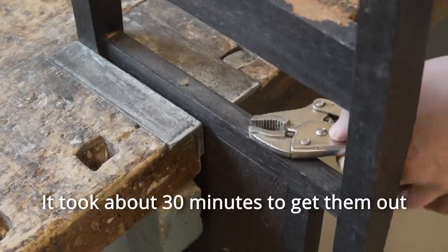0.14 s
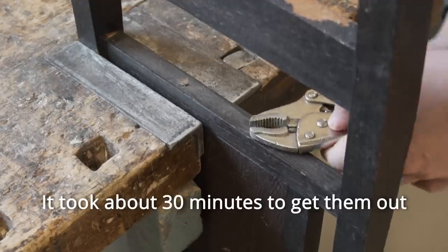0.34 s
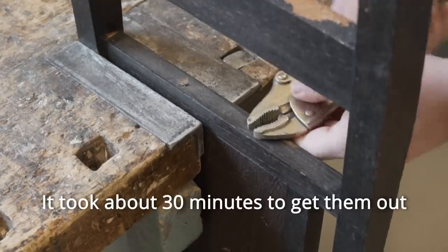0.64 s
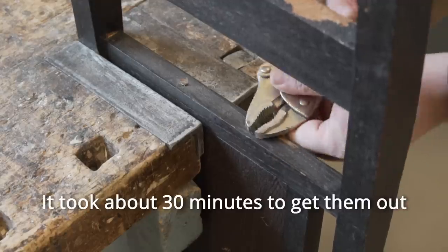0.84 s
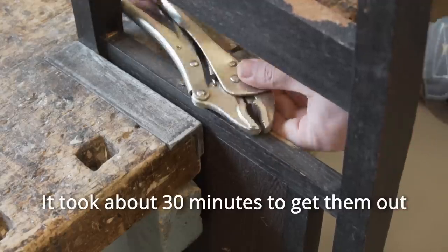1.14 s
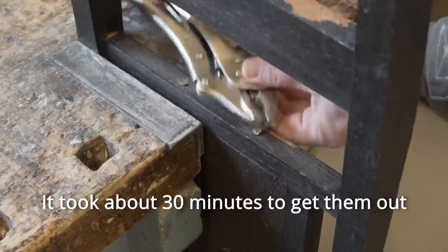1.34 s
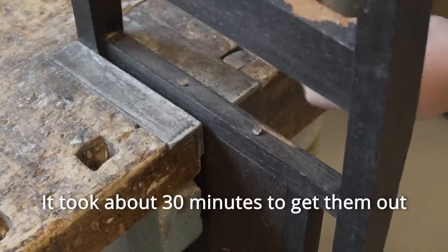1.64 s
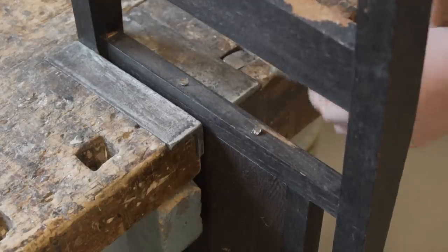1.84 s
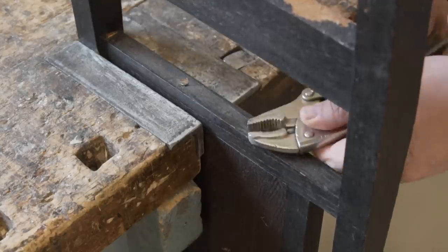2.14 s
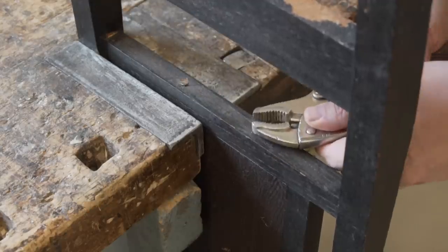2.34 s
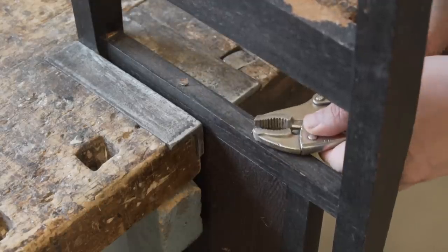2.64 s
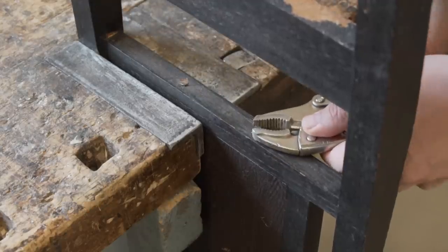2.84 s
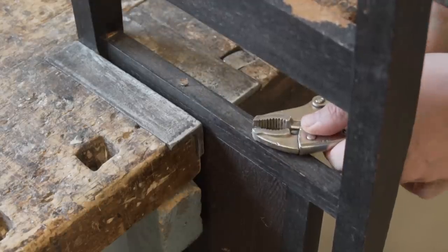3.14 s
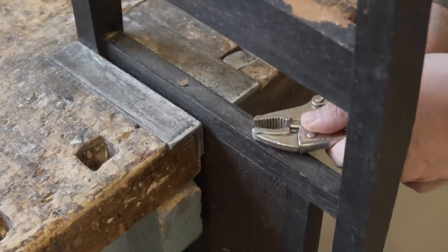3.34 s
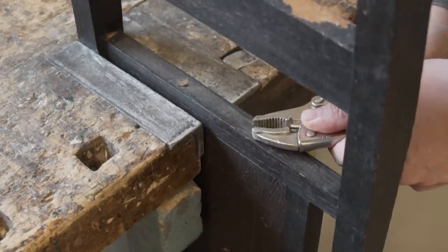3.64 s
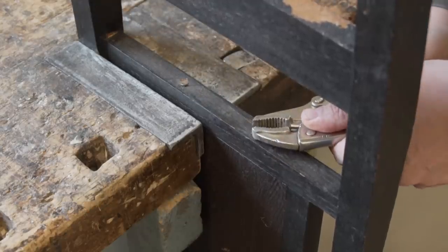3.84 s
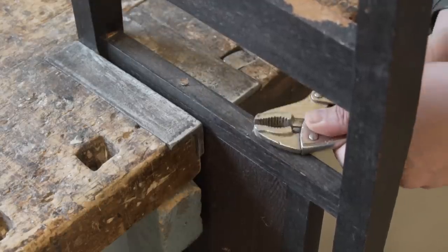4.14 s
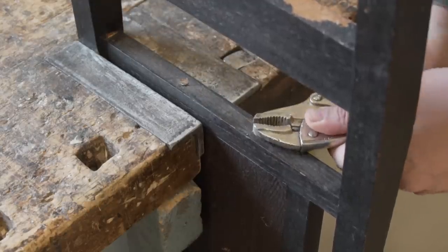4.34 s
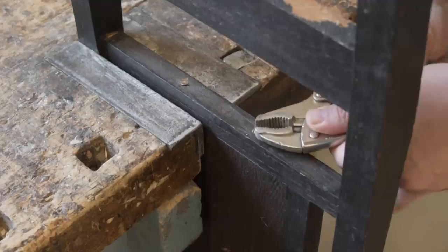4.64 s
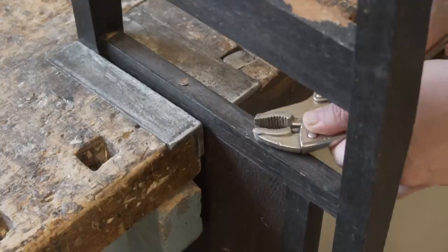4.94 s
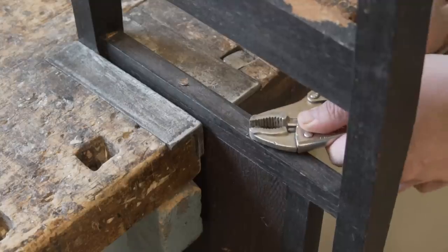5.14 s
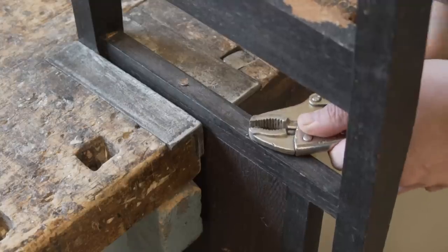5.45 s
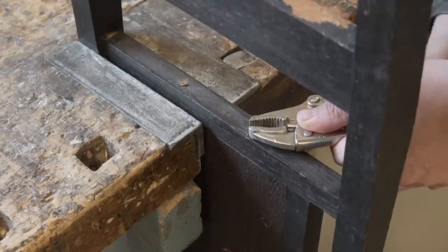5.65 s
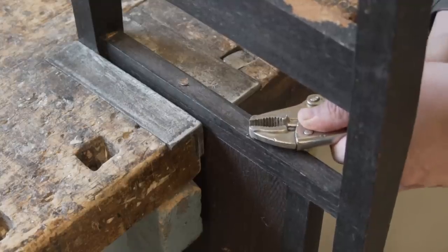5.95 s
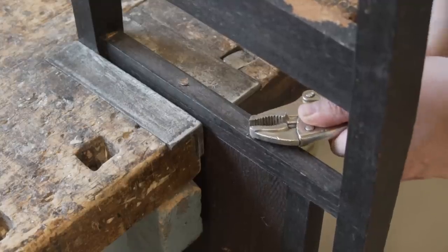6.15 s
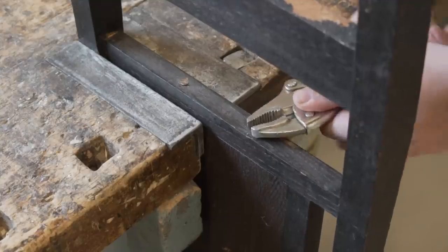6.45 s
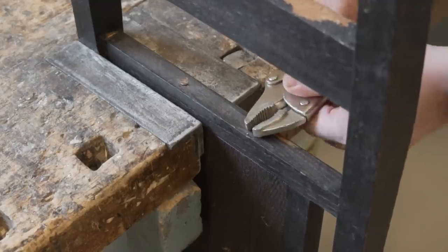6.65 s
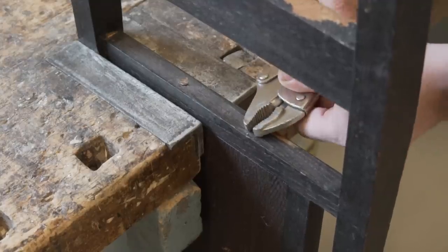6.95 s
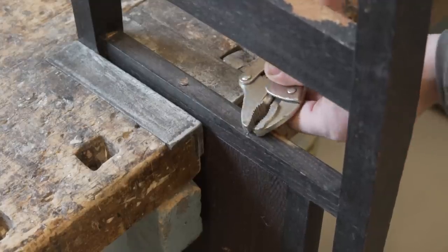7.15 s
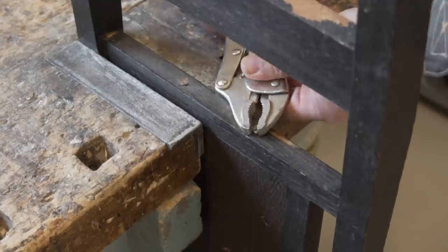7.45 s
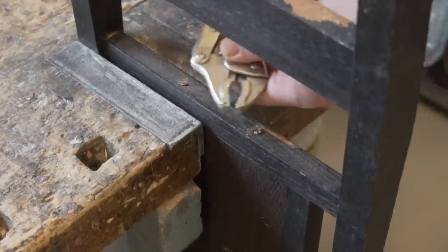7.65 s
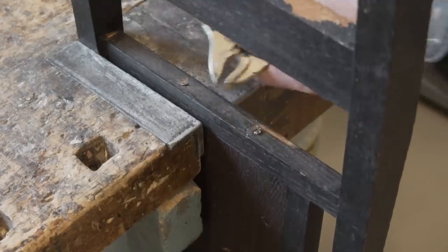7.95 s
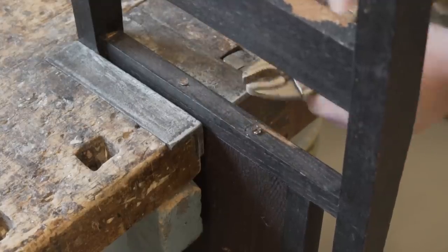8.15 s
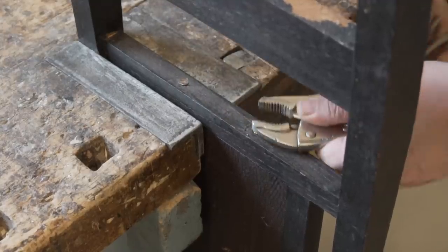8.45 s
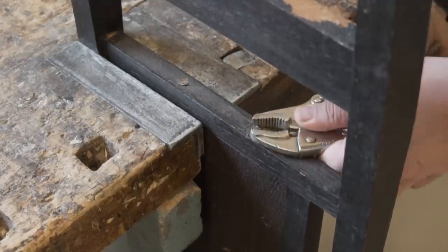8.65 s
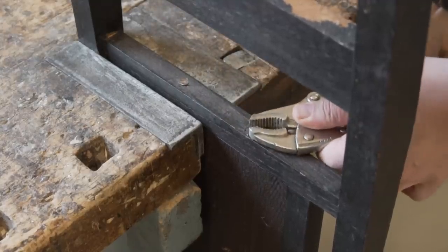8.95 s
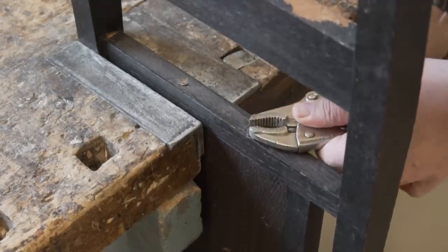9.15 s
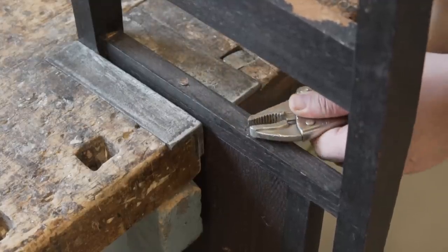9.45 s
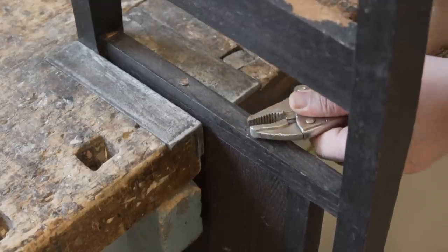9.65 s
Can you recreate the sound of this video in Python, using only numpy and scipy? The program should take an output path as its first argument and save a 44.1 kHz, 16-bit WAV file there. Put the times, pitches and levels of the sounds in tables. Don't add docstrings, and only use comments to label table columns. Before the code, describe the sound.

Locking pliers snap open and shut on a nail in a wooden rail, with hard metallic clacks, knocks, short scrapes and lingering steel ringing.

```python
import sys
import numpy as np
from scipy import signal
from scipy.fft import rfft, irfft
from scipy.io import wavfile
from scipy.ndimage import uniform_filter1d

SR = 44100
rng = np.random.default_rng(int(sys.argv[2]) if len(sys.argv) > 2 else 0)


def dump_mix(stems):
    frames = np.atleast_2d(stems).T
    limited = np.clip(frames, -1, 1)
    pcm = np.round(limited * 32767).astype(np.int16)
    wavfile.write(sys.argv[1], SR, pcm)


def gain_from_decibels(decibels):
    exponent = np.asarray(decibels, float) / 20
    return 10 ** exponent


N = 432180
LEAD = SR // 2
OPPOSITE = np.array([[1], [-1]])


def band(x, lo_hz, hi_hz):
    y = signal.sosfilt(signal.butter(2, [lo_hz, min(hi_hz, .45 * SR)], "band", fs=SR, output="sos"), x)
    return y / np.sqrt(np.mean(y ** 2))


def fade(t, t60_s):
    return np.exp(-np.log(1000) * t / t60_s)


def add(track, s, sound):
    i = max(LEAD + int(s * SR), 0)
    track[..., i:i + sound.shape[-1]] += sound[..., :track.shape[-1] - i]


def blows():
    # [t/s, peak/dB, wood thud/dB, rail body/dB, steel edge/dB]
    snaps = [
        (-0.3938, -11, -11, -5, 9),
        (1.1518, -17, -4, -4, 4),
        (1.1653, -15, -22, -9, 7),
        (1.1717, -8, -21, -5, 1),
        (4.0339, -14.5, -15, -6.5, -5.5),
        (5.678, -13.5, -24, -11, -1),
        (7.5394, -16.5, -5.5, 4.5, 0.5),
        (9.399, -20, -17.5, -8.5, 3),
    ]
    # [t/s, peak/dB, wood thud/dB, rail body/dB, steel edge/dB]
    raps = [(1.0456, -32.5, -1, 3.5, -11.5), (1.1064, -28, -11, -8, -18), (1.14, -30.5, -17, 0, -17),
            (1.1797, -20.5, -5, -9, -9), (1.245, -20, -20, -3, -20), (2.173, -20, -26, -7, -24),
            (2.2115, -27, -30, -9, -25), (2.0603, -17, -24.5, -12.5, -20), (2.0678, -20.5, -19, -6.5, -54),
            (2.5276, -17, -6.5, -5, -27), (2.602, -10, -7, -2, -28), (2.6146, -13, -19, -2.5, -26),
            (4.514, -33, -31, -10.5, -17), (4.575, -25.5, -30, -10, -25), (4.644, -27, -15, -2.5, -23),
            (4.5985, -22, 0, 1, -31), (4.6104, -20.5, -22.5, -5, -22), (4.814, -19.5, 0.5, 3, -5.5),
            (5.0427, -54, -6, -10, -24.5), (5.1017, -28.5, -3, 0.5, -46), (5.6905, -25.5, -30, -2.5, -15.5),
            (6.4613, -32, -26.5, -14.5, -38), (6.6848, -37.5, -45, -6, -19.5), (8.431, -26.5, -20, -6, -19),
            (8.572, -39, -4, -5, -24), (8.7091, -22, -7.5, -4.5, -22.5), (8.8439, -28.5, -5, 0, -25),
            (9.1102, -59, 11.5, -17, 8)]
    # [t/s, peak/dB, wood thud/dB, rail body/dB, steel edge/dB]
    taps = [
        (0.7628, -38, -13, -9, -30),
        (2.165, -8, -26, -15, -21.5),
        (2.2022, -14.5, -37.5, -10, -25),
        (2.5177, -20.5, -10.5, -2.5, -25.5),
        (3.6197, -33, -37.5, -4, 0),
        (4.6776, -24.5, -22, -6, -17),
        (4.6875, -28.5, -21, -39, 10),
        (8.4243, -18.5, -16.5, -12, -19),
    ]
    # [t/s, peak/dB, rail body/dB, steel edge/dB, part f/Hz]
    ticks = [(1.8857, -50, -57, 1, 4000), (1.892, -35, -51, 11.5, 4840), (1.949, -36.5, -23, 5, 3080),
             (2.0262, -34, -40, 5, 4030), (2.4342, -52, -29, -7, 3720), (7.5618, -32, -40, 12, 10600),
             (5.337, -50.5, -16.5, 7.5, 10230), (7.0234, -52.5, -17.5, -1.5, 4610),
             (7.566, -38, -6, 6, 5600), (7.7032, -40, -15, 7, 6400), (7.8316, -37.5, -21, 1, 6340),
             (7.949, -45.5, -24, 7.5, 4080), (8.0312, -42, -32.5, 8.5, 3900), (8.059, -41, -48.5, 2, 3960),
             (8.0983, -49, 1.5, 14, 8050), (8.105, -40, -45.5, 5, 3570), (8.2033, -47, -33, 0.5, 3550),
             (8.2467, -39, -69, 8, 4160)]
    # [t/s, peak/dB, wood thud/dB, steel edge/dB, frame f/Hz]
    bumps = [
        (2.335, -52, 21.5, -19.5, 360),
        (3.17, -79, 16.5, -8.5, 301),
        (4.43, -54.5, 14.5, -6.5, 500),
        (6.05, -71.5, 26.5, -9.5, 350),
        (6.701, -45, -9, -21, 500),
        (8.578, -49.5, 11, -8, 560),
        (8.61, -56, 21.5, -13, 250),
        (3.23, -80.5, 14.5, -7.5, 450),
        (9.13, -75, 23, -5, 260),
    ]
    struck = []
    for rows, room_db, hz in (snaps, -0.67, 1740), (raps, -2, 1780), (taps, -2, 2556):
        struck += [(s, room_db, *rest, hz) for s, *rest in rows]
    thud_db = -49.5
    struck += [(s, -1, peak_db, thud_db, *rest) for s, peak_db, *rest in ticks]
    body_db = 13.5
    bumped = [(s, -2, peak_db, thud, body_db, *rest) for s, peak_db, thud, *rest in bumps]
    return sorted(struck) + bumped


def knock(peak_db, thud_db, body_db, edge_db, hz, tinted):
    # [f/Hz, width/Hz, gain/dB]
    jaws = [(503, 25, 3), (623, 32, 5), (1103, 36, 2), (1600, 54, -2), (2380, 570, 1.5), (3127, 39, 1),
            (4350, 150, -0.5)]
    size = 4096
    t = np.arange(size) / SR
    f = np.arange(size // 2 + 1) * SR / size + 1
    corners_hz = [30, 200, 520, 700, 1350, 1700, 4600, 4950, 12000, 20000]
    dull_db = min(edge_db, 0)
    levels_db = [thud_db - 23, thud_db + 5, thud_db + 14.5, body_db + 7.5, body_db + 5.0, 0,
                 .3 * dull_db - 0.12 * body_db + 0.5, edge_db - 0.28 * dull_db - 0.5,
                 edge_db - 4.0, edge_db - 0.5]
    db = np.interp(np.log(f), np.log(corners_hz), levels_db)
    db += 2.2 * np.interp(np.log(f) * 22, np.arange(240), rng.standard_normal(240))
    shift = 1 + .012 * rng.standard_normal()
    for centre_hz, width_hz, gain in jaws + tinted + [(hz, 0.068 * hz, 6)]:
        db += gain * np.exp(-.5 * ((f - centre_hz * shift) / width_hz) ** 2)
    fold = irfft(np.log(gain_from_decibels(db)))
    fold[1:size // 2] *= 2
    fold[size // 2 + 1:] = 0
    colour = np.exp(rfft(fold)) * gain_from_decibels(peak_db - 5.5)

    impacts = rng.standard_normal((2, size)) * gain_from_decibels(0.73 * rng.exponential(size=size))
    mid, side = rfft(impacts) * colour
    grit = mid + .8 * side / (1 + 2500 / f) * OPPOSITE
    wood = 1 / (1 + (f / 650) ** 4)
    steel = 1 / (1 + (5000 / f) ** 6)
    slow = irfft(grit * wood) * (1 - np.exp(-t / 0.011)) * fade(t, 0.065)
    last = np.clip(1.1 + .012 * peak_db, .55, 1)
    body_fade = fade(t, 0.097 * last) + 0.37 * fade(t, 0.016) + .8 * fade(t, 0.0044)
    steel_fade = fade(t, 0.065 * last) + 0.8 * fade(t, 0.013) + 1.3 * fade(t, 0.0033)
    quick = irfft(grit * (1 - wood - steel)) * body_fade + irfft(grit * steel) * steel_fade
    quick *= 1 - np.exp(-t / 0.0013)
    click = irfft(colour)
    crack = signal.sosfilt(signal.butter(1, 800, "high", fs=SR, output="sos"), click)
    return np.vstack([slow + quick + gain_from_decibels(15) * crack, gain_from_decibels(22.5) * click])


def knocks(t):
    # [from t/s, to t/s, f/Hz, width/Hz, gain/dB]
    tints = [(1.12, 1.3, 2340, 150, 5.5), (1.12, 1.3, 2600, 744, -3), (1.12, 1.3, 11120, 760, 2.5),
             (1.8, 1.93, 12000, 394, 5), (1.8, 1.93, 2890, 200, 10.5), (2.12, 2.28, 4320, 250, 7),
             (2.12, 2.28, 9324, 500, 0), (3.5, 3.8, 8050, 400, 5), (3.5, 3.8, 1470, 140, 8.5),
             (3.9, 4.2, 1197, 80, 6), (3.9, 4.2, 3750, 154, 1.5), (4.75, 4.95, 2140, 350, 5.5),
             (2.45, 2.7, 6200, 1100, 6.5), (8.65, 8.9, 6900, 960, 8), (5.55, 5.8, 10060, 460, 5.5),
             (5.55, 5.8, 1290, 130, 8.5), (7.45, 7.63, 10350, 210, 7.5), (1.12, 1.3, 620, 90, 4),
             (8.33, 8.5, 760, 190, -9), (2.45, 2.7, 1660, 250, -2.5), (2.7, 2.7, 530, 66, 2),
             (7.45, 7.63, 740, 134, 4.5), (7.45, 8.4, 4000, 310, 3), (8.33, 8.5, 4040, 630, 6.5),
             (9.3, 9.5, 1740, 100, -4), (9.3, 9.5, 1963, 142, 10.5), (8.33, 8.5, 1780, 100, -5.5),
             (8.33, 8.5, 1370, 130, 3.5), (8.65, 8.8, 600, 80, 5.5), (5.08, 5.12, 670, 140, 3.5),
             (3.9, 4.2, 160, 50, -5.5), (1.0, 1.3, 130, 41, -4), (4.75, 5.12, 130, 46, -3),
             (1.3, 2.1, 250, 150, -5.5), (7.45, 6.8, 520, 60, -2), (4.75, 5.4, 1280, 86, -5),
             (9.3, 9.5, 626, 70, -7.5), (9.3, 9.5, 3600, 150, 1), (3.5, 3.8, 3350, 297.4, 9.5),
             (1.12, 1.16, 7100, 500, 2.5)]
    out = np.zeros((3, len(t)))
    for s, room_db, peak_db, *colour in blows():
        tinted = [mode for start, stop, *mode in tints if start < s < stop]
        sound = knock(peak_db - gain_db(s), *colour, tinted)
        add(out, s, sound * gain_from_decibels(np.array([[0], [0], [room_db]])))
    return out


def cracks(t):
    # [t/s, peak/dB, strongest f/Hz]
    contacts = [(1.1722, -11, 1650), (1.8919, -28, 5100), (2.0254, -30, 3930), (2.0602, -22.5, 1750),
                (2.0673, -21, 1490), (2.1649, -12, 2560), (2.2019, -13.5, 2560), (2.5182, -24.5, 1040),
                (2.602, -18, 1680), (2.6174, -17.5, 1140), (3.6199, -37, 3330), (4.574, -30, 1170),
                (4.597, -20.5, 1660), (4.612, -27, 1670), (4.6887, -20, 2580), (4.8144, -24, 1670),
                (5.104, -38, 1670), (6.6934, -37, 2050), (7.5429, -17, 1300), (8.4245, -27.5, 4300),
                (8.43, -23, 3070), (8.5144, -32, 1050), (8.5744, -40, 1140), (8.6234, -44, 1130),
                (8.7085, -25.5, 1750), (8.8443, -36, 1740),
                (7.5393, -15.5, 4070),
        (7.5667, -21, 5220),
        (7.7024, -29, 5100),
        (7.8316, -30, 6540),
        (7.9478, -43, 4080),
        (8.0321, -37, 3950),
        (8.0586, -35, 3930),
        (8.0985, -33, 8400),
        (8.1044, -34, 7190),
        (8.2477, -34.5, 4410),
    ]
    out = np.zeros((2, len(t)))
    short = np.arange(1024) / SR
    width = 1.7
    for s, db, hz in contacts:
        mid, side = rng.standard_normal((2, len(short))) * fade(short, .018)
        grit = band(mid + 0.64 * side * OPPOSITE, hz / width, hz * width)
        add(out, s, gain_from_decibels(db - 2.5 - gain_db(s)) * grit / np.abs(grit).max())
    return out


def ring(t, hz, t60_s):
    waver = gain_from_decibels(2.5 * np.interp(t * 22, np.arange(34), rng.standard_normal(34)))
    return fade(t, t60_s) * waver * np.sin(2 * np.pi * hz * t)


def rings(t):
    # [f/Hz, level/dB, t60/s]
    locked = [(496, -11, 1.4), (511, -7, 1.6), (1394, -8, .8), (1739, 0, 1.4), (2274, -3, 1.1),
              (2420, -4, 1.6), (2756, -6, 1.5), (3058, -7, 1.0), (3327, -10, 1.3), (3461, -8, 1.2),
              (3973, -5, 1.1), (4037, -8, 1.1), (4231, -10, .9), (4936, -19, 1.3)]
    # [f/Hz, level/dB, t60/s]
    opened = [(479, -8, .5), (738, -10, .7), (1943, -12, .6), (2283, -9, 1.0), (2842, -4, 1.2),
              (3402, -9, .8), (3688, -13, 1.0), (3973, -13, 1.2), (4479, -4, 1.3)]
    # [t/s, locked level/dB, open level/dB]
    struck = [
        (1.172, -58, -58),
        (2.165, -66, -52),
        (2.602, -70, -56),
        (4.034, -50, -60),
        (5.678, -45, -70),
        (7.539, -62, -64),
        (8.425, -62, -66),
        (9.399, -44, -66),
    ]
    # [t/s, f/Hz, level/dB, t60/s]
    tings = [(-.45, 1461, -52, 1.6), (-.45, 490, -59, 1.8), (2.026, 3900, -42, .15),
             (2.165, 7300, -36, .03), (2.202, 7400, -38, .03), (3.15, 3680, -77, .6),
             (7.562, 10520, -41, .3), (7.559, 10700, -30, .05), (7.562, 10640, -39, .33),
             (8.437, 468, -50, .3), (8.5, 480, -47, .2), (8.89, 480, -54, .3), (9.399, 492, -51, 1.6),
             (4.513, 5050, -54, .04), (5.339, 10150, -57, .3), (7.832, 6500, -50, .1),
             (7.948, 4100, -58, .08), (8.059, 3900, -48, .1), (8.248, 4200, -52, .15),
             (9.399, 505, -47, 2.0)]
    out = np.zeros((3, len(t)))
    short = t[:int(1.5 * SR)] - t[0]
    beam = gain_from_decibels(np.array([[0], [0], [-18]]))
    for s, locked_db, open_db in struck:
        for db, modes in ((locked_db, locked), (open_db, opened)):
            tone = sum(gain_from_decibels(g + rng.standard_normal()) * ring(short, hz, t60_s) for hz, g, t60_s in modes)
            add(out, s, beam * gain_from_decibels(db) * tone)
    for s, hz, db, t60_s in tings:
        add(out, s, beam * gain_from_decibels(db) * ring(short, hz, t60_s))
    return out


def scrape(t):
    # [start t/s, hold/s, level/dB, wood share/dB]
    drags = [(0.587, 0.073, -59.5, -8.5), (0.702, 0.086, -57.5, -20), (0.782, 0.043, -57, -16),
             (0.88, 0.28, -66, -13), (1.046, 0.17, -46.5, 4), (2.255, 0.03, -37, -16),
             (6.04, .03, -59.5, 0.5), (2.33, 0.017, -49, 5.5), (2.44, .02, -83.5, 0),
             (3.565, 0.024, -69, 4.5), (4.571, 0.024, -29.5, -24), (4.633, 0.012, -45, 7),
             (5.048, 0.0041, -47, 8), (5.114, 0.0025, -57, -4), (5.199, 0.099, -64, -7),
             (6.475, 0.013, -47, -15.5), (6.536, 0.027, -54, -29.5), (6.602, 0.013, -50, -24.5),
             (6.694, 0.0035, -41, -7.5), (7.362, 0.055, -61.5, -23), (7.406, 0.013, -63.5, 9),
             (8.511, 0.004, -41.5, -1), (8.578, 0.014, -57.5, 7.5), (8.615, 0.26, -55.5, -3),
             (8.897, 0.078, -58, -12.5)]
    bite_db_per_s, let_go_db_per_s = 1497, 380.5
    slips = rng.standard_normal((3, len(t))) * gain_from_decibels(2.2 * rng.exponential(size=len(t)))
    patch = gain_from_decibels(0.59 * band(rng.standard_normal(len(t)), 25, 90))
    rail = band(slips[0], 870, 3300)
    wood = band(slips[1], 250, 840)
    steel = band(slips[2], 4200, 9300)
    out = np.zeros(len(t))
    for s, hold_s, db, wood_db in drags:
        on = slice(*np.searchsorted(t, [s - .1, s + hold_s + .3]))
        early_s = np.maximum(s - t[on], 0)
        late_s = np.maximum(t[on] - s - hold_s, 0)
        press_db = db - bite_db_per_s * early_s - let_go_db_per_s * late_s
        steel_db = 1.5 - 0.83 * (db + 69.5)
        mix = rail[on] + gain_from_decibels(wood_db) * wood[on] + gain_from_decibels(steel_db) * steel[on]
        out[on] += gain_from_decibels(press_db - 9.0) * mix
    return out * patch


def spread(mid, side, like):
    return np.sqrt(1 + like) * mid + np.sqrt(1 - like) * side * OPPOSITE


def workshop(x):
    # [f/Hz, t60/s, level/dB, build-up/s]
    room = [(60, 0.2, -9, .04), (126, 0.4, 5, 0.036), (250, 0.47, 8, 0.09), (500, 0.62, -1.5, 0.0038),
            (1000, 0.67, -3.5, 0.0085), (2050, 0.66, -1.5, 0.0026), (4000, 0.63, -4.5, 0.0035),
            (6400, 0.52, -6.5, 0.0064), (10200, 0.34, -4, 0.0048)]
    likeness = [.8, .95, .96, .92, .77, .56, .45, .33, .33]
    t = np.arange(SR) / SR
    echo = 0
    for (hz, t60_s, db, rise_s), like in zip(room, likeness):
        noise = spread(*rng.standard_normal((2, len(t))), like)
        tail = band(noise, hz / 1.77, hz * 1.124) * fade(t, t60_s) * (1 - np.exp(-t / rise_s))
        echo = echo + gain_from_decibels(db) * tail * np.sqrt(hz / SR) * 0.045
    return signal.fftconvolve(x[None], echo, axes=1)[:, :len(x)]


def air():
    # [f/Hz, density/dB per Hz]
    tone = [(18, -63.5), (30, -27.5), (92, -28), (978, -9.5), (1160, -7.5), (1390, -9.5), (3480, -12),
            (4250, -14), (5320, -15.5), (9190, -17.5), (11500, -19.5), (15000, -62), (22000, -120)]
    # [t/s, level/dB]
    drift = [(0, 5), (1.8, 9.5), (3.4, 3), (5.6, 6.5), (7.1, 8), (9.3, 4.5)]
    # [f/Hz, rms/dB]
    hum = [(1098, -90.5), (1200, -83), (1303, -91), (1599, -95)]
    hz, db = np.transpose(tone)
    f = np.arange(N // 2 + 1) * SR / N + 1
    like = np.interp(np.log(f), np.log([200, 3000]), [.8, .2])
    mid, side = rfft(rng.standard_normal((2, N))) * gain_from_decibels(np.interp(np.log(f), np.log(hz), db))
    hiss = irfft(spread(mid, side, like), N)
    hiss /= np.sqrt(np.mean(hiss.mean(axis=0) ** 2))
    t = np.arange(N) / SR
    sway = band(rng.standard_normal(N), 2, 5.8)
    whine = sum(gain_from_decibels(g + 6 + 0.85 * sway) * np.sin(2 * np.pi * h * t) for h, g in hum)
    return gain_from_decibels(-76 + np.interp(t, *np.transpose(drift))) * hiss + whine


def gain_db(t):
    # [t/s, depth/dB, brief extra depth on the first blow/dB]
    ducks = [
        (1.153, -8.5, 0),
        (1.172, 10, -1.5),
        (2.163, 7, -9.5),
        (2.602, 4, -5),
        (4.036, 14.5, 12.5),
        (4.814, 1.5, -1),
        (5.68, 13.5, 2.5),
        (7.539, 7, -2),
        (8.424, 4, -2),
        (9.401, 14, 9),
    ]
    release_db_per_s, brief_s = 114, .014
    dips = []
    for s, db, brief_db in ducks:
        held_db = np.maximum(db - release_db_per_s * (t - s), 0)
        first_db = brief_db * np.exp(-np.abs(t - s) / brief_s)
        dips.append(np.where(t >= s - .004, held_db + first_db, 0))
    return -np.max(dips, axis=0)


def scene():
    t = (np.arange(N + LEAD) - LEAD) / SR
    tool = knocks(t) + rings(t) + scrape(t)
    near = tool[:2] * gain_from_decibels(np.array([[-.4], [.4]]))
    return (near + workshop(tool[2]) + cracks(t))[:, LEAD:] + air()


def top_cut(x):
    return signal.sosfilt(signal.butter(12, 12300, fs=SR, output="sos"), x)


def record(dry):
    x = dry * gain_from_decibels(uniform_filter1d(gain_db(np.arange(N) / SR), size=64))
    x = signal.sosfilt(signal.butter(2, 90, "high", fs=SR, output="sos"), x)
    x = signal.sosfilt(signal.ellip(10, .5, 50, 11020, fs=SR, output="sos"), x)
    return top_cut(x)


dry = scene()
out = record(dry)
dump_mix(out)
```